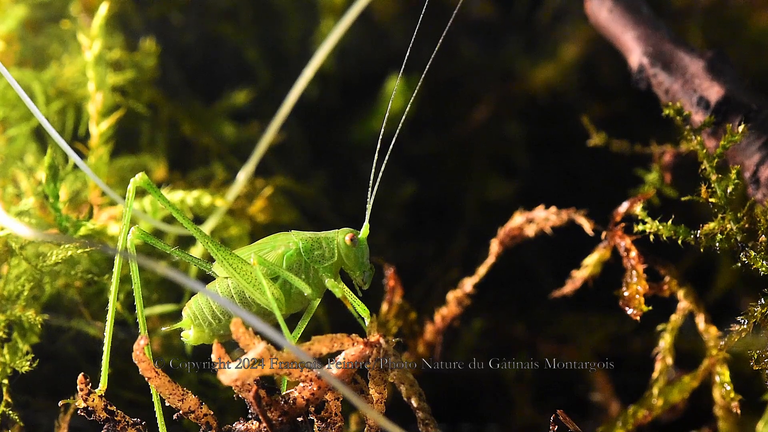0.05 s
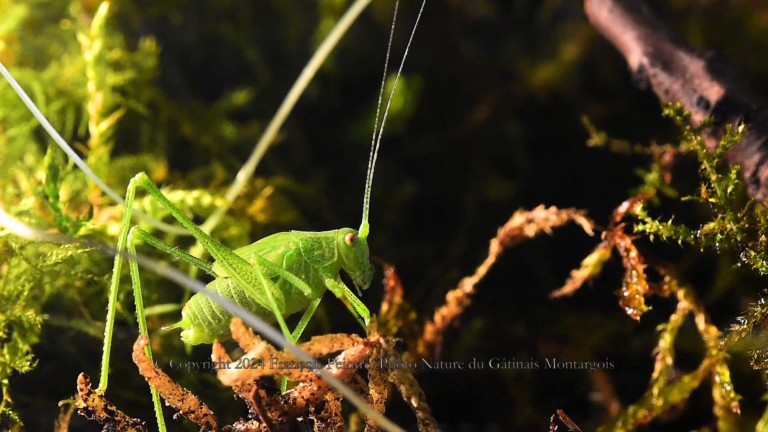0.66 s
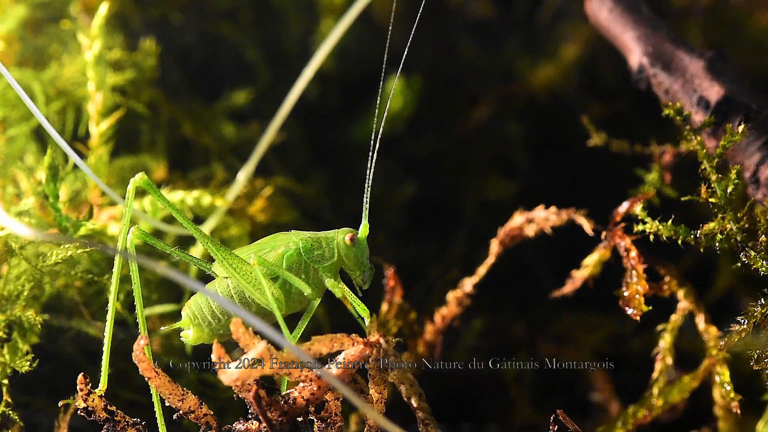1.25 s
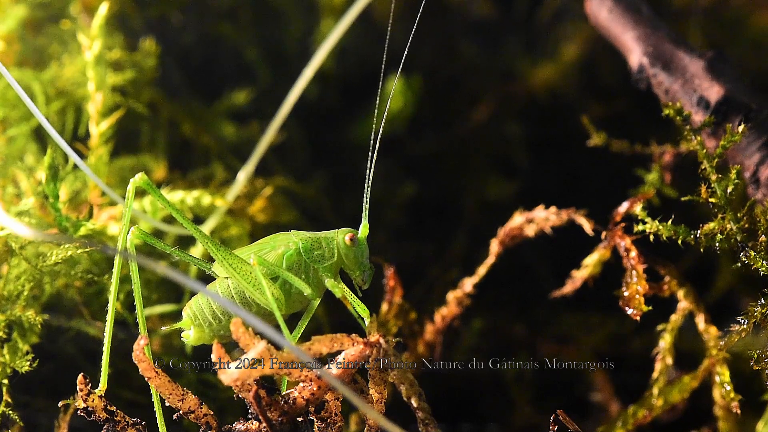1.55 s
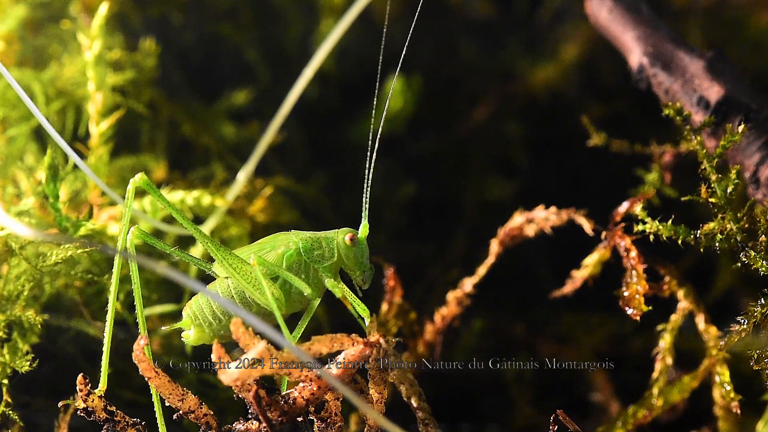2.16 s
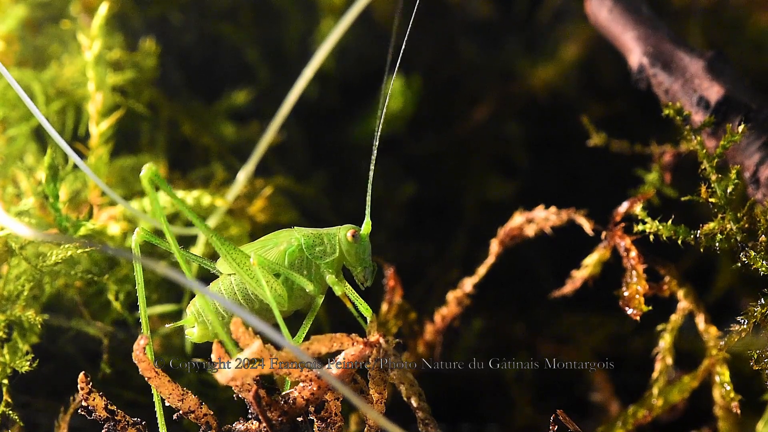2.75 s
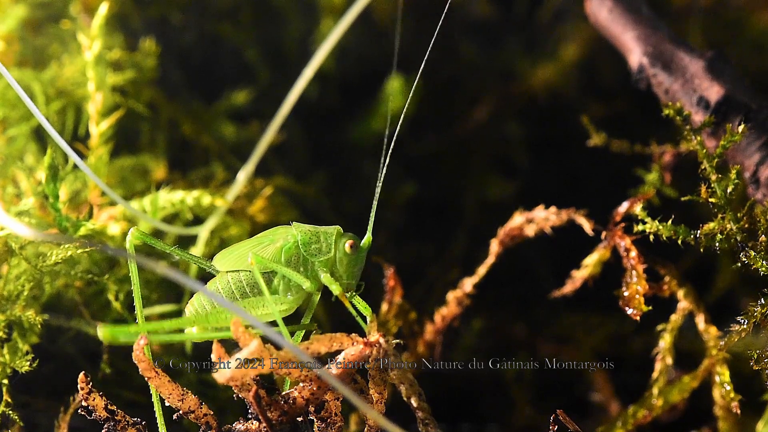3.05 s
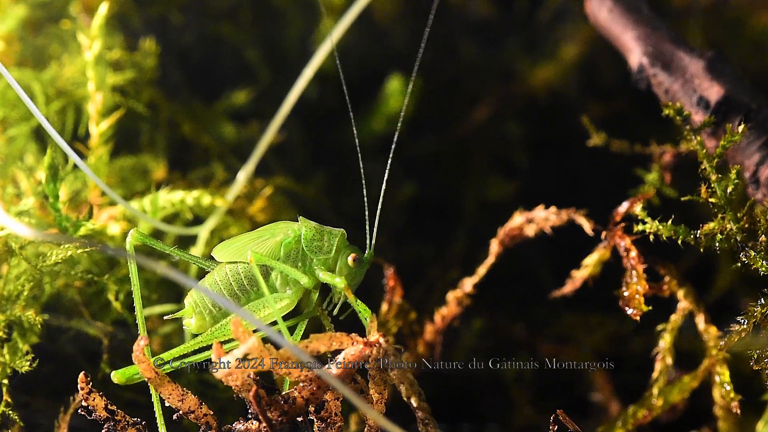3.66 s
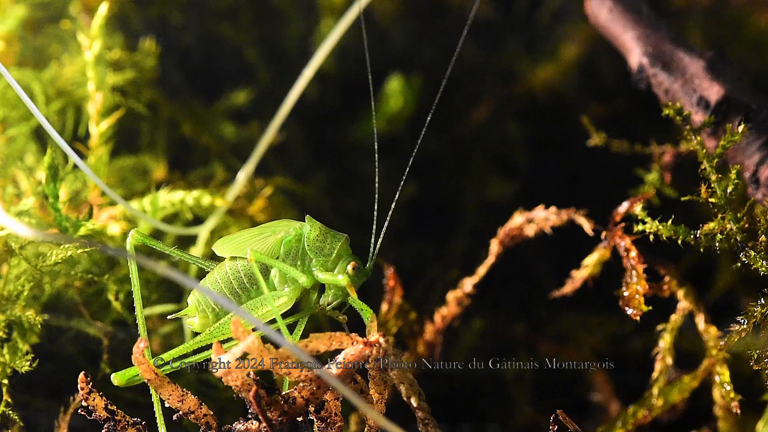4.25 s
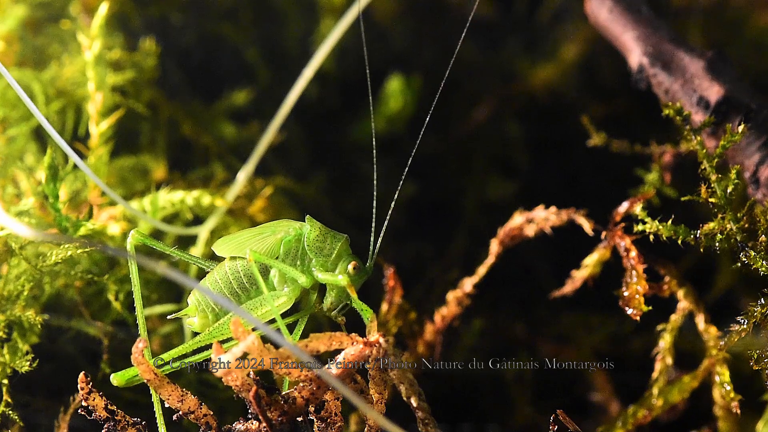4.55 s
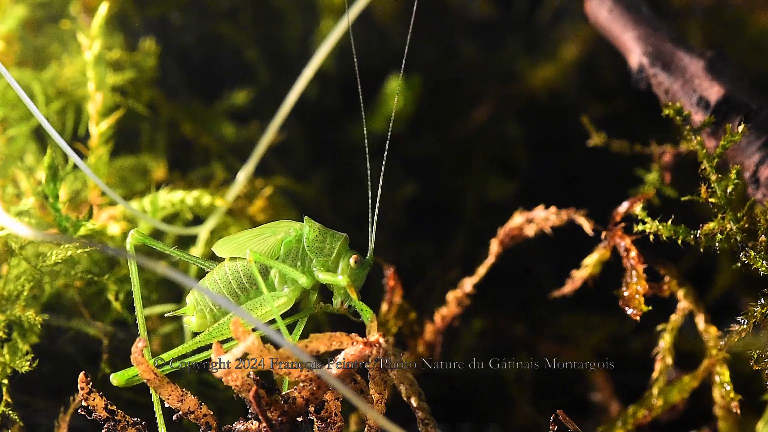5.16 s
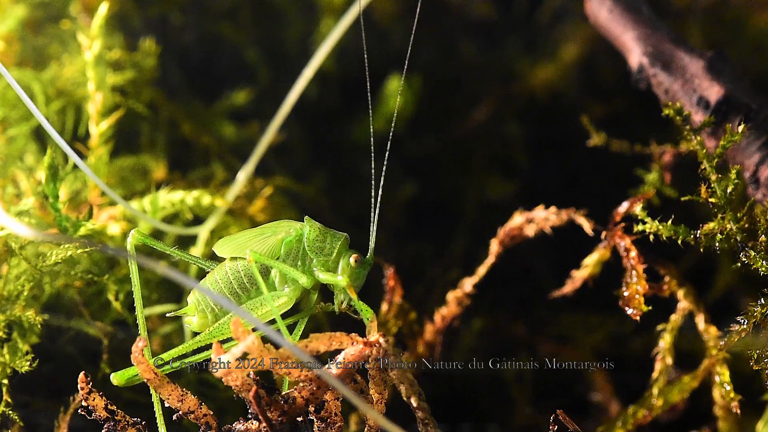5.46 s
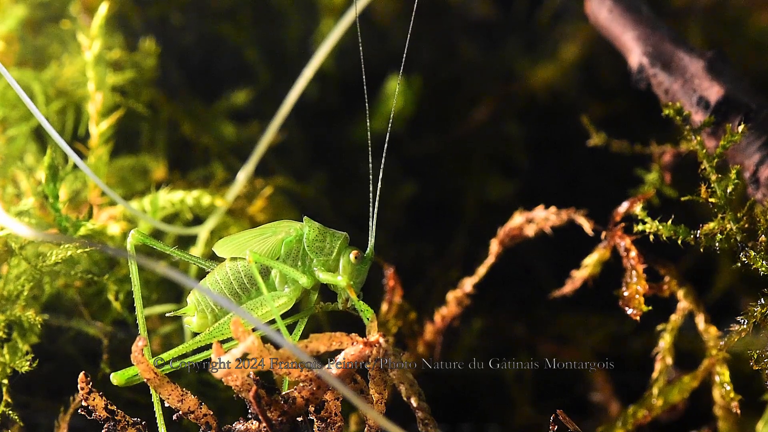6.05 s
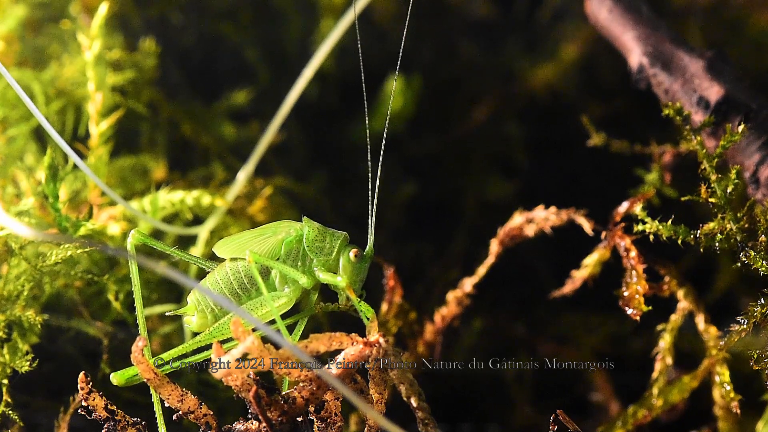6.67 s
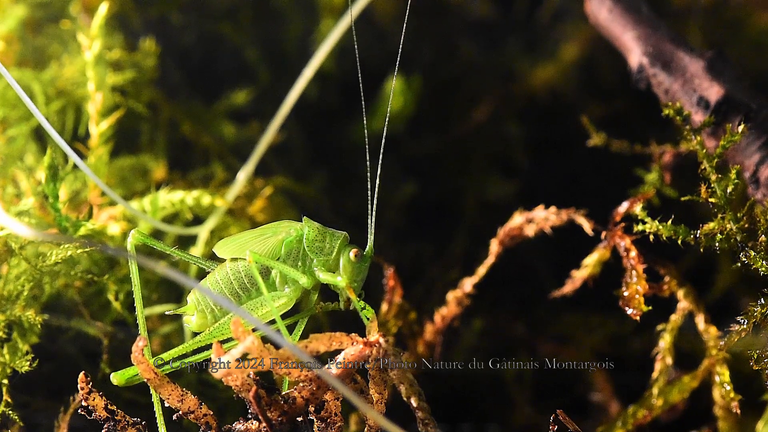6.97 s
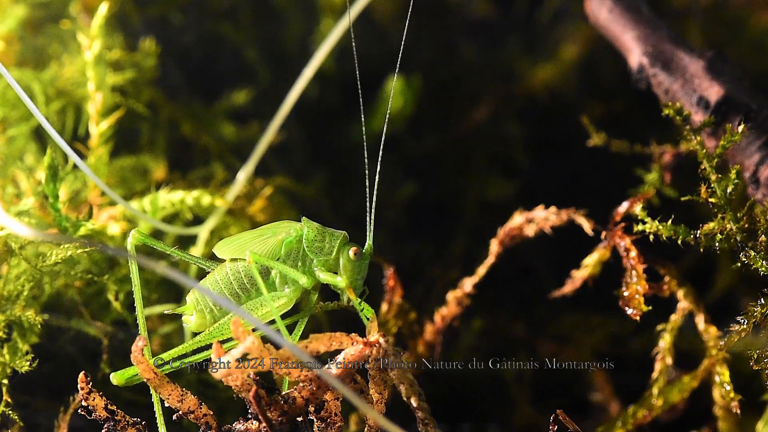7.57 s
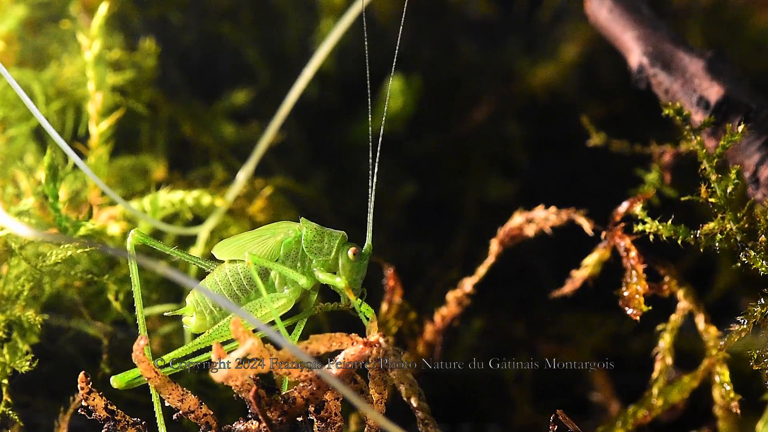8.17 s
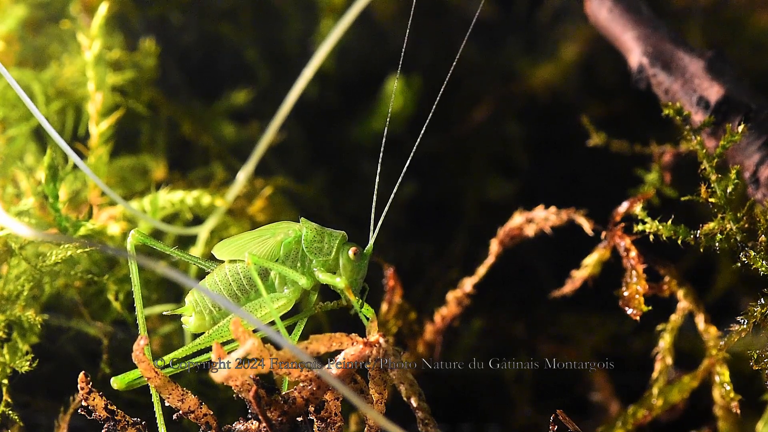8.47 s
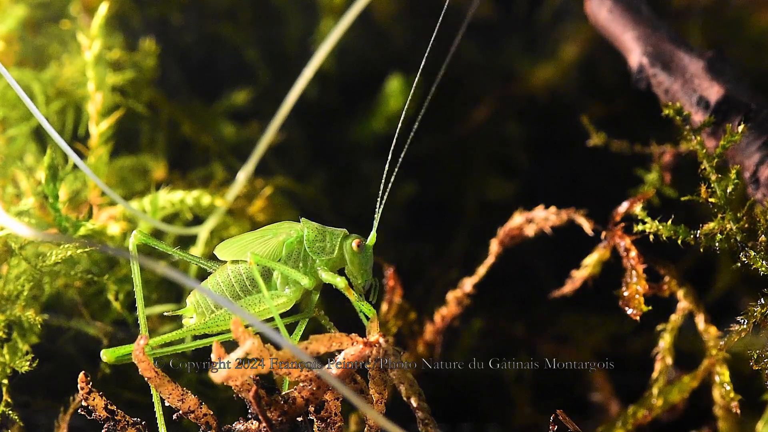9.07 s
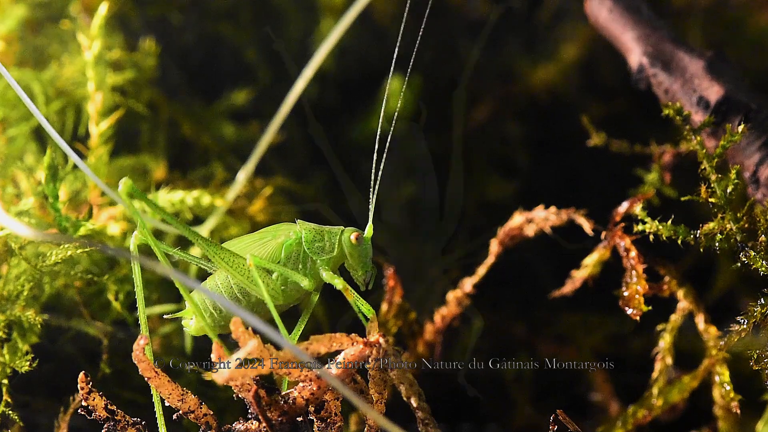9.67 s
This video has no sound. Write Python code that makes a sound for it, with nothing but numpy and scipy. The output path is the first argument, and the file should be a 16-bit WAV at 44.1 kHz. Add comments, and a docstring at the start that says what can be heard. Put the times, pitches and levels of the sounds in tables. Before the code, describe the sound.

Songbirds overlap in a wood, heard in stereo over a quiet, steady bed of air, with short echoes from trunks and leaves. A warbler chatters throughout in quick slurs, rasps and scratchy nasal notes, while mellow fluting and faint chirps come from further off. At about 1.4 seconds the loudest bird gives a pure whistle that swells as it falls, followed by four quick chirps. It whistles again at 2.6 seconds, with one chirp. Soft wingbeats pass from about 1.7 to 3.5 seconds. A second bird sings high zips and thin, buzzy rising and falling notes from about 2.8 to 4.4 seconds. The quieter chatter continues through the middle. The falling whistle returns at 7.7 seconds with four chirps, and high buzzy notes join from 8.6 seconds. The strongest whistle comes at 9.4 seconds, followed by one last chirp.

```python
"""Songbirds sing over each other in a wood, loudest a falling whistle followed by chirps.
A second bird sings high buzzy arches, a warbler chatters between them, mellow fluting comes from further off.
Each voice is a vibrating syrinx membrane filtered by the throat; trunks and leaves scatter every note.
Wings flap by over a quiet bed of air. A stereo pair of microphones hears it all."""
import sys
import numpy as np
from scipy import signal
from scipy.fft import rfft, irfft, next_fast_len
from scipy.io import wavfile
from scipy.ndimage import uniform_filter1d

SR = 44100
rng = np.random.default_rng(int(sys.argv[2]) if len(sys.argv) > 2 else 0)


def persist_wave(psi):
    """Save psi, clipped to +-1, as 16-bit WAV."""
    counts = np.round(np.clip(psi, -1, 1) * 32767).astype(np.int16)
    wavfile.write(sys.argv[1], SR, np.atleast_2d(counts).T)


N = 433062
TIME = np.arange(N) / SR

# whistle contour: offset_s, pitch_hz, level_db, buzz_depth_hz
WHISTLE_CONTOUR = [(0, 4296, -26, 0), (.04, 4212, -20, 0), (.08, 3980, -9.5, 0), (.12, 3858, -6, 0),
                   (.16, 3700, -4, 0.004), (.19, 3630, -2, 0), (.208, 3647, -3, 0), (.217, 3700, -24.5, 0)]
# whistles: start_s, pitch_ratio, level_db
WHISTLES = [(1.383, .99, -26), (2.569, 1.008, -22.5), (7.674, 1.0, -24), (9.41, 1.005, -21)]
def falling_whistles():
    """Lead bird: a pure tone that swells as it falls."""
    return repeated(WHISTLE_CONTOUR, WHISTLES, jitter=0.004, flutter_db=4.5)


# chirp contour: offset_s, pitch_hz, level_db, buzz_depth_hz
CHIRP_CONTOUR = [(0, 2843, -8.5, 99), (.008, 3145, 0, 200), (.019, 3518, -1, 280), (.028, 2750, -3.5, 250),
                 (.041, 3340, -5, 221.4), (.052, 3814, -5.5, 100), (.058, 3740, 2, 30),
                 (.075, 3460, 3.5, 30), (.088, 3330, 0.5, 29.7), (.097, 3413, -0.5, 30)]
# chirps: start_s, pitch_ratio, level_db
CHIRPS = [(1.665, 1, -29), (1.823, 0.99, -30.5), (1.981, 1, -32), (2.146, 1.002, -30), (2.859, 1.04, -27.5),
          (7.955, 1.018, -29.5), (8.106, 1.02, -29), (8.27, 0.98, -30), (8.438, 0.98, -30.5),
          (9.7, 1.042, -26.5)]
def chirps():
    """Lead bird: a raspy zigzag, then a loud downslur."""
    return repeated(CHIRP_CONTOUR, CHIRPS, jitter=0.013, flutter_db=3)


# high syllables: start_s, length_s, mid_pitch_hz, level_db
TSIPS = [(1.078, 0.052, 6170, -33), (1.398, 0.027, 5980, -29), (8.79, 0.025, 5210, -23.5)]
SIZZLES = [(2.43, 0.2, 7480, -48.5), (8.59, 0.12, 5800, -38.5), (8.61, .12, 7630, -45.5),
           (9.428, .122, 6450, -29), (9.675, 0.11, 6410, -29.5)]
ZITS = [(3.335, 0.03, 4790, -29.5), (9.346, 0.028, 5470, -29), (9.596, .031, 5490, -27)]
FLICKS = [(2.291, 0.031, 5190, -30.5), (2.854, 0.038, 4350, -28), (3.37, 0.023, 5380, -30),
          (8.762, 0.038, 4430, -28.5)]
SWOOPS = [(2.893, .1, 3850, -26), (3.112, 0.08, 3610, -30.5)]
def high_singer():
    """Second bird: arches, zips, pure tsips and buzzy slurs."""
    return (arches() + zip_run()
            + slurs(TSIPS, semitones=(0.52, -0.26), jitter=0.0019, flutter_db=-1)
            + slurs(SIZZLES, semitones=(0.85, -1.65), depth_hz=307, trill_hz=296.6, jitter=0.006)
            + slurs(ZITS, semitones=(1.74, -4.5), depth_hz=320, trill_hz=294, jitter=0.012)
            + slurs(FLICKS, semitones=(-2.59, 2.94), depth_hz=262, trill_hz=282, jitter=0.036)
            + slurs(SWOOPS, semitones=(7.3, -4), depth_hz=225, trill_hz=291.4, jitter=0.01))


# quick arch contour: length_share, pitch_hz, level_db, buzz_depth_hz
ARCH_CONTOUR = [(0, 5690, -8, 100), (.08, 6600, 4.5, 400), (0.188, 6940, -2, 250), (.33, 7600, -8.5, 100),
                (.62, 8020, -6.5, 100), (.82, 7750, -5, 120), (.92, 6240, 4, 200), (1, 4410, -0.5, 150)]
# quick arches: start_s, length_s, level_db
QUICK_ARCHES = [(3.282, .178, -27.5), (3.525, .16, -29.5)]
# long arch contour: time_s, pitch_hz, level_db
LONG_ARCH = [(4.027, 4850, -43), (4.049, 5260, -26.5), (4.081, 6440, -31.5), (4.179, 6860, -33),
             (4.29, 6660, -36), (4.307, 6180, -31.5), (4.345, 4560, -21.5), (4.365, 4330, -25.5),
             (4.385, 4090, -45)]
def arches(buzz_hz=290, undertone_db=-13, long_depth_hz=340):
    """Thin arches roughened by a fast pitch buzz; the quick ones carry a soft tone an octave below."""
    out = np.zeros(N)
    share, hz, db, depth_hz = np.transpose(ARCH_CONTOUR)
    for start_s, length_s, level_db in QUICK_ARCHES:
        add(out, start_s, glide(share * length_s, hz, db + level_db, depth_hz, buzz_hz,
                                jitter=0.0085, flutter_db=4.5, flutter_per_s=560))
        add(out, start_s, glide(share * length_s, hz / 2, level_db + undertone_db, jitter=0.013))
    time_s, hz, db = np.transpose(LONG_ARCH)
    add(out, time_s[0], glide(time_s, hz, db, long_depth_hz, buzz_hz,
                              jitter=0.0095, flutter_db=4.5, flutter_per_s=500))
    return out


def zip_run(start_s=3.049, count=7, gap_s=0.0265, length_s=0.025, pitch_hz=5810, fade_db_per_s=14):
    """Steep upward zips in a quick, fading row, no two alike."""
    errors = rng.uniform(-2.2, 2, (count, 3)) / np.sqrt(2)
    notes = []
    for offset_s, (late, sharp, loud) in zip(gap_s * np.arange(count), errors):
        level_db = -27.5 - fade_db_per_s * offset_s + 3.5 * loud
        hz = pitch_hz * (1 + 0.0453 * sharp)
        notes.append((start_s + offset_s + 0.003 * late, length_s, hz, level_db))
    return slurs(notes, semitones=(-3.5, 4.2), depth_hz=300, trill_hz=246, jitter=0.016)


# warbler syllables: start_s, length_s, mid_pitch_hz, level_db
DOWNSLURS = [(.375, 0.043, 3130, -45.5), (.805, 0.081, 3390, -43.5), (4.943, .054, 2950, -38.5),
             (5.703, 0.023, 3000, -46), (7.116, 0.05, 3060, -38.5), (7.428, 0.035, 3215, -36.5),
             (9.085, 0.047, 3210, -42), (9.395, 0.047, 3246, -36.5)]
RASPS = [(.182, .055, 4820, -44), (.345, .04, 4310, -37), (2.35, .017, 4020, -34.5),
         (4.637, 0.022, 4080, -33.5), (5.237, 0.03, 3335, -34.5), (5.988, 0.03, 4440, -38),
         (6.804, .044, 3690, -39.5), (7.357, 0.026, 3760, -43.5), (8.222, 0.037, 4550, -37.5)]
RISES = [(.47, 0.048, 2427, -42.5), (.96, 0.043, 3285, -41.5), (1.26, 0.073, 3090, -43.5),
         (4.375, 0.048, 2530, -42), (5.07, 0.073, 2797, -37.5), (5.535, 0.095, 2822, -39),
         (7.238, .076, 2800, -38), (7.755, .13, 2777, -40.5), (9.525, 0.084, 2830, -37)]
UPTICKS = [(.735, .068, 4450, -43.5), (1.037, 0.014, 4800, -35), (1.353, .015, 4430, -36),
           (5.912, 0.09, 5285, -42), (6.04, .028, 4150, -37.5), (6.088, .021, 4740, -39),
           (6.145, 0.023, 4620, -38), (6.775, 0.051, 4910, -46.5), (8.15, 0.068, 5156, -41),
           (8.28, 0.02, 4280, -36), (8.39, 0.012, 4360, -35), (8.555, 0.031, 4550, -41)]
BUZZES = [(4.725, 0.17, 4153, -40), (6.885, 0.16, 3850, -45), (9.2, .14, 4140, -40.5)]
WOBBLES = [(1.69, 0.089, 2720, -40.5), (3.762, 0.0443, 2516, -35.5), (3.893, 0.055, 2560, -35),
           (4.473, 0.041, 2556, -36), (4.628, 0.0424, 2490, -37), (5.166, 0.039, 3430, -39.5),
           (8.795, 0.049, 2520, -41)]
PEAKS = [(.065, 0.091, 4073, -42), (.51, 0.063, 3410, -39), (4.135, 0.049, 4380, -40),
         (5.815, .07, 7540, -49.5), (8.045, 0.065, 7790, -45.5)]
SCOOPS = [(.888, 0.026, 3416, -36.5), (1.133, 0.055, 3600, -41.5), (2.688, .1, 3030, -34.5),
          (7.387, .02, 3560, -38.5), (8.882, 0.1, 3068, -34), (9.118, 0.1, 3055, -35)]
HOOKS = [(1.33, .067, 3615, -40.5), (3.05, 0.063, 4120, -33), (3.06, 0.03, 2580, -38.5),
         (3.215, 0.036, 3250, -44), (3.25, 0.048, 2620, -44), (4.442, .017, 3410, -34.5),
         (5.635, 0.027, 3404, -34), (6.538, 0.037, 2540, -44), (6.596, 0.02, 3200, -39.5),
         (9.005, 0.023, 2624, -36), (9.248, 0.036, 2756, -38.5)]
def warbler():
    """Chatter strung from nine kinds of whistled syllable."""
    return (slurs(DOWNSLURS, semitones=(4.3, -5), jitter=0.014)
            + slurs(RASPS, semitones=(5.1, -2.5), depth_hz=220, trill_hz=202)
            + slurs(RISES, semitones=(-3, 2.19), depth_hz=80, trill_hz=46.5, jitter=0.008)
            + slurs(UPTICKS, semitones=(-3, 1.48), depth_hz=167, trill_hz=197.7)
            + slurs(BUZZES, semitones=(-5, 1), depth_hz=630, trill_hz=171, jitter=0.0254)
            + slurs(WOBBLES, semitones=(0.057, -0.83), depth_hz=260, trill_hz=38.6)
            + slurs(PEAKS, semitones=(-4.5, -7), jitter=0.01)
            + slurs(SCOOPS, semitones=(3.4, 0.5), depth_hz=110, trill_hz=123.6)
            + slurs(HOOKS, semitones=(-1.23, 0.036), jitter=0.012))


# arched triplets, rising stutters: start_s, pitch_hz, throat_hz, level_db
NASAL_TRIPLETS = [(0.599, 1016, 2480, -48), (1.483, 1034, 3320, -42.5), (5.333, 997, 3020, -43),
                  (7.535, 999, 3150, -45)]
NASAL_STUTTERS = [(0.861, 933, 4800, -45), (1.17, 908, 4270, -42), (4.497, 1135, 5180, -39),
                  (6.657, 934, 5300, -42.5), (8.941, 948, 5420, -39)]
# lone notes: start_s, length_s, pitch_hz, throat_hz, level_db
LONE_NASALS = [(.272, 0.038, 934, 3470, -45), (.265, 0.043, 930, 5300, -45.5),
               (1.874, .17, 1753, 5630, -46.5), (2.058, .12, 1003, 5660, -43),
               (5.167, 0.02, 1080, 4070, -41), (6.266, 0.0273, 940, 5200, -37),
               (6.394, 0.017, 968, 5050, -38), (8.678, 0.02, 912, 4660, -39)]
def nasal_calls(triplet_gap_s=0.057, triplet_note_s=0.0344, stutter_gap_s=0.041, stutter_note_s=0.0242):
    """The warbler's nasal notes: even threes, slowing threes or alone."""
    beats = np.arange(3)
    stretch = 1.3 ** beats
    offsets_s = stutter_gap_s * (np.cumsum(stretch) - stretch)
    triplets = [(start_s + k * triplet_gap_s, triplet_note_s, *voice)
                for start_s, *voice in NASAL_TRIPLETS for k in beats]
    stutters = [(start_s + offsets_s[k], stutter_note_s * stretch[k], *voice)
                for start_s, *voice in NASAL_STUTTERS for k in beats]
    return (nasal_voice(triplets, semitones=(-2.72, -3.4), jitter=0.033)
            + nasal_voice(stutters, semitones=(-2.04, 1.42), jitter=0.033)
            + nasal_voice(LONE_NASALS, semitones=(-1.4, 0.1), jitter=0.031))


# far syllables: start_s, length_s, mid_pitch_hz, level_db
FLUTES = [(.13, 0.083, 2552, -53), (1.93, 0.059, 2520, -53.5), (2.235, 0.039, 2094, -52),
          (2.62, 0.19, 1867, -56.5), (3.61, 0.055, 1905, -53), (3.97, .27, 1918, -53.5),
          (4.3, 0.099, 2184, -56.5), (5.725, 0.034, 1930, -43.5), (6.24, 0.26, 1913, -66),
          (6.9, 0.51, 1992, -68), (7.962, 0.021, 1913, -42.5), (8.14, 0.123, 1806, -56.5),
          (8.345, .2, 1889, -54.5), (8.63, 0.11, 2708, -51), (9.09, .15, 2203, -52), (9.66, 0.2, 2104, -54)]
FLUTE_FALLS = [(2.588, 0.035, 2100, -48.5), (3.03, 0.0302, 2250, -48), (3.075, 0.034, 1990, -50.5),
               (3.405, .045, 2380, -61), (3.675, .06, 3020, -58), (3.93, 0.037, 2350, -45),
               (4.51, 0.037, 2180, -54), (8.08, 0.073, 2156, -53.5), (9.35, .15, 1702, -57)]
FLUTE_TRILLS = [(2.455, .16, 2918, -43.5), (3.785, .15, 2875, -41)]
HOOT = [(7.17, 0.43, 444, -78.5)]
def fluting():
    """Mellow wavering notes, falls and trills from further off, and one low hoot."""
    return (slurs(FLUTES, semitones=(-1.134, -1.04), depth_hz=39, trill_hz=7.14, jitter=0.012)
            + slurs(FLUTE_FALLS, semitones=(3.5, -3.5), jitter=0.015)
            + slurs(FLUTE_TRILLS, semitones=(-1.07, -1), depth_hz=143.5, trill_hz=72.7, jitter=0.01)
            + slurs(HOOT, semitones=(-0.82, -0.5), jitter=0.005))


def far_chorus(count=80, level_db=-60, centre_hz=3400, spread=0.22):
    """Distant birds chirp at random: rising, falling and trilled notes."""
    def notes():
        pitches_hz = centre_hz * np.exp(spread * rng.triangular(-2, 0, 2, count))
        return [((k + late) / count * N / SR, 0.03 + 0.09 * long,
                 pitches_hz[k], level_db + 6 * (loud - 0.5))
                for k, (late, long, loud) in enumerate(rng.random((count, 3)))]
    return (slurs(notes(), semitones=(-3, 1.16))
            + slurs(notes(), semitones=(2.5, -3.5))
            + slurs(notes(), semitones=(-1.22, -1.16), depth_hz=228, trill_hz=108.3))


def repeated(contour, repeats, jitter, flutter_db, buzz_hz=240):
    """A learnt syllable, sung each time a little higher or lower."""
    out = np.zeros(N)
    offset_s, hz, db, depth_hz = np.transpose(contour)
    for start_s, pitch_ratio, level_db in repeats:
        add(out, start_s, glide(offset_s, hz * pitch_ratio, db + level_db, depth_hz, buzz_hz,
                                jitter, flutter_db, flutter_per_s=179.7))
    return out


def glide(time_s, hz, db, depth_hz=0, buzz_hz=0, jitter=0.003, flutter_db=2, flutter_per_s=150):
    """One whistled phrase along a pitch and level contour."""
    t = np.arange(int(max(time_s[-1] - time_s[0], 0.01) * SR)) / SR
    pitch, level, depth = [np.interp(t + time_s[0], time_s, np.broadcast_to(column, time_s.shape))
                           for column in (hz, db, depth_hz)]
    phase = syrinx(t, uniform_filter1d(pitch, size=200), depth, buzz_hz, jitter)
    tone = pure_tone(phase, second_db=-46, third_db=-51)
    fades = signal.windows.tukey(len(t), min(0.0008 / t[-1], 1))
    return from_db(level) * flutter(t, flutter_db, flutter_per_s) * tone * fades


def slurs(notes, semitones, depth_hz=0, trill_hz=0, jitter=0.018, flutter_db=4):
    """Short whistled notes sharing one pitch bend and an optional trill."""
    out = np.zeros(N)
    for start_s, length_s, hz, db in notes:
        t, pitch_hz, envelope = bend(length_s, hz, semitones)
        tone = pure_tone(syrinx(t, pitch_hz, depth_hz, trill_hz, jitter), second_db=-31.5, third_db=-44)
        add(out, start_s, from_db(db) * envelope * flutter(t, flutter_db, per_s=270) * tone)
    return out


def nasal_voice(notes, semitones, jitter, width_hz=900, quaver_share=0.029, quaver_hz=48, leak=0.0087):
    """A low, scratchy pulsing voice whose overtones sweep through one throat resonance."""
    out = np.zeros(N)
    harmonics = np.arange(2, 10)[:, None]
    for start_s, length_s, hz, throat_hz, db in notes:
        t, pitch_hz, envelope = bend(length_s, hz, semitones, attack_share=0.33, release_share=0.26)
        overtone_hz = harmonics * pitch_hz
        gains = 1 / (1 + ((overtone_hz - throat_hz) / width_hz) ** 2) + leak * (overtone_hz < throat_hz)
        phase = syrinx(t, pitch_hz, quaver_share * pitch_hz, quaver_hz, jitter)
        tone = rms_one((gains * np.sin(harmonics * phase)).sum(0))
        add(out, start_s, from_db(db) * envelope * flutter(t, db=5.5, per_s=300) * tone)
    return out


def bend(length_s, mid_hz, semitones, attack_share=0.21, release_share=0.13):
    """Time, parabolic pitch and envelope of a note; semitones = (start, end) relative to mid_hz."""
    t = np.arange(int(max(length_s, 0.005) * SR)) / SR
    share = t / t[-1]
    anchors_hz = mid_hz * 2 ** (np.array([semitones[0], 0, semitones[1]]) / 12)
    pitch_hz = np.polyval(np.polyfit([0, 0.5, 1], anchors_hz, 2), share)
    ramp = np.clip(np.minimum(share / attack_share, (1 - share) / release_share), 0, 1)
    return t, pitch_hz, np.sin(np.pi / 2 * ramp)


def syrinx(t, hz, depth_hz, trill_hz, jitter, unevenness=0.05):
    """Phase of a membrane whose pitch wavers and is shaken by a slightly uneven trill."""
    rate_hz = trill_hz * (1 + unevenness * wander(t, per_s=144.6))
    trill = np.cos(2 * np.pi * np.cumsum(rate_hz) / SR)
    pitch_hz = hz * (1 + jitter * wander(t, per_s=508)) + depth_hz * trill
    return 2 * np.pi * np.cumsum(pitch_hz) / SR


def pure_tone(phase, second_db=-40, third_db=-43):
    """The throat passes little but the fundamental; rms 1."""
    return np.sqrt(2) * (np.sin(phase) + from_db(second_db) * np.sin(2 * phase)
                         + from_db(third_db) * np.sin(3 * phase))


def flutter(t, db, per_s):
    """Uneven pulsing of the air flow; mean power 1."""
    return rms_one(from_db(db * wander(t, per_s)))


def roughen(song, rough_db, width_hz, hiss_db, highpass_hz):
    """Roughens each note and adds a faint hiss that follows its loudness."""
    lowpass = signal.butter(2, width_hz, fs=SR, output="sos")
    highpass = signal.butter(2, highpass_hz, "high", fs=SR, output="sos")
    shake = rms_one(signal.sosfilt(lowpass, rng.standard_normal(N)))
    hiss = signal.sosfilt(highpass, rng.standard_normal(N))
    loudness = np.sqrt(np.abs(uniform_filter1d(song ** 2, size=128)))
    return song * (1 + from_db(rough_db) * shake) + from_db(hiss_db) * loudness * hiss


# echoes off ground and nearest trunks: delay_s, level_db
ECHOES = [(.0062, -6), (.0135, -10), (.029, -25.5)]
def wood(song, scatter_db, tail_db, scatter_t60_s, left_db, tail_t60_s=1):
    """Direct sound, echoes off near trunks, quick scatter from foliage and a longer faint tail."""
    t = np.arange(int(0.8 * SR)) / SR
    twigs = rng.standard_normal((2, len(t))) * (rng.random((2, len(t))) < 900 / SR)
    scatter = rms_one(twigs * from_db(-60 * t / scatter_t60_s) * (t > 0.002))
    tail_envelope = from_db(-60 * t / tail_t60_s) * np.minimum(t / 0.033, 1)
    tail = rms_one(rng.standard_normal((2, len(t))) * tail_envelope)
    response = (from_db(scatter_db) * scatter + from_db(tail_db) * tail) / np.sqrt(len(t))
    response[:, 0] += 1
    for k, (delay_s, db) in enumerate(ECHOES):
        side = k % 2
        response[side, int(delay_s * SR)] += from_db(db)
        response[1 - side, int((delay_s + 0.0003) * SR)] += from_db(db) / 2
    balance = from_db([[left_db / 2], [-left_db / 2]])
    return signal.oaconvolve(song[None], response, axes=1)[:, :N] * balance


def wingbeats(start_s=1.69, count=13, beat_s=0.1435, quickening_s=0.001, stroke_s=0.029,
              nearest_s=2.24, pass_s=0.74, level_db=-54):
    """A large bird flies past: each downstroke pushes out a whoosh, loudest where it is nearest."""
    gaps_s = beat_s - quickening_s * np.arange(count)
    times_s = start_s + np.cumsum(gaps_s) - gaps_s
    strokes = sum(np.exp(-0.5 * ((TIME - s) / stroke_s) ** 2) for s in times_s)
    distance = np.hypot(1, (TIME - nearest_s) / pass_s)
    whoosh = noise([(280, -45), (430, -2), (900, -2), (1500, -9.5), (3000, -16.5)])
    return from_db(level_db) * strokes / distance * whoosh


# air spectrum: frequency_hz, relative_db
AIR_SPECTRUM = [(18, -34), (30, -14.5), (65, -15), (180, -14), (822, -7.5), (908, -6), (1570, -9.5),
                (2060, -8), (2580, -2.5), (3230, -10), (3480, -5), (4360, -3), (6330, -14.5), (10700, -13),
                (11500, -20), (12200, -70), (15000, -105), (22000, -120)]
def still_air(level_db=-56):
    """A steady, quiet bed of noise."""
    return from_db(level_db) * noise(AIR_SPECTRUM, correlation=0.81)


# rush envelope: time_s, level_db
RUSH_ENVELOPE = [(7.8, -77), (8.1, -62.5), (8.45, -59), (8.8, -63), (9.1, -74)]
def far_rush(gain_db=-2):
    """A soft midrange rush swells and fades once."""
    level_db = np.interp(TIME, *np.transpose(RUSH_ENVELOPE), left=-120, right=-120)
    return from_db(gain_db + level_db) * noise([(600, -23), (1100, -2.5), (1400, -8), (2200, -32)])


# drone partials: pitch_hz, level_db
DRONE_PARTIALS = [(69, -83.5), (139, -89.5)]
def far_drone():
    """Two faint, low, wavering tones."""
    return sum(from_db(db) * pure_tone(2 * np.pi * hz * TIME + wander(TIME, per_s=9.8))
               for hz, db in DRONE_PARTIALS)


def noise(spectrum, correlation=1):
    """Stereo noise coloured by (frequency_hz, relative_db) points; rms 1."""
    size = next_fast_len(N)
    colour = from_db(at_hz(spectrum, np.fft.rfftfreq(size, 1 / SR)))
    mid, side = irfft(rfft(rng.standard_normal((2, size))) * colour, size)[:, :N]
    return rms_one(np.sqrt(1 + correlation) * mid + np.sqrt(1 - correlation) * side * [[1], [-1]])


def wander(t, per_s):
    """Random drift, spread about 1."""
    return np.interp(t * per_s, np.arange(512), rng.standard_normal(512))


def from_db(db):
    """Decibels to gain."""
    return 10 ** (np.asarray(db) / 20)


def rms_one(x):
    """Scale to rms 1."""
    return x / np.sqrt(np.mean(x ** 2) + 1e-20)


def at_hz(points, hz):
    """Read a table on a log-frequency axis."""
    points_hz, values = np.transpose(points)
    return np.interp(np.log(np.maximum(hz, 1)), np.log(points_hz), values)


def add(out, start_s, sound):
    """Mix a sound in at start_s."""
    i = max(int(start_s * SR), 0)
    out[i:i + len(sound)] += sound[:max(N - i, 0)]


def scene():
    """Each voice has its own level, scatter and balance in the wood, over the background."""
    whistling = from_db(-1) * falling_whistles()
    chirping = from_db(-1) * chirps()
    high = from_db(-4) * roughen(high_singer(),
                                 rough_db=-20.5, width_hz=680, hiss_db=-22.5, highpass_hz=3540)
    chatter = from_db(-2.5) * roughen(warbler() + nasal_calls(),
                                      rough_db=-13, width_hz=410, hiss_db=-39, highpass_hz=2000)
    far = fluting() + far_chorus()
    return (wood(whistling, scatter_db=-1, tail_db=-8.5, scatter_t60_s=0.084, left_db=-1)
            + wood(chirping, scatter_db=-6, tail_db=-15.5, scatter_t60_s=0.16, left_db=-1.5)
            + wood(high, scatter_db=-2.5, tail_db=-23, scatter_t60_s=0.22, left_db=-0.1)
            + wood(chatter, scatter_db=-3.5, tail_db=-13, scatter_t60_s=0.13, left_db=-2.5)
            + wood(far, scatter_db=0, tail_db=-17.5, scatter_t60_s=0.092, left_db=-2)
            + still_air() + far_rush() + far_drone() + wingbeats())


# phase between the microphones: frequency_hz, left_lead_rad
MIC_PHASE = [(300, -0.27), (700, -0.62), (1100, -0.36), (1900, -1.38), (2900, -2.16), (3800, -1.7),
             (5000, -1.6), (7500, -1.44)]
CUTOFF_HZ = 11800
def record(dry):
    """The two microphones hear the treble out of step; the top is cut."""
    size = next_fast_len(N + 4096)
    lead_rad = at_hz(MIC_PHASE, np.fft.rfftfreq(size, 1 / SR))
    rotation = np.exp(0.5j * lead_rad * np.array([[1], [-1]]))
    pair = irfft(rfft(dry, size) * rotation, size)[:, :N]
    return signal.sosfilt(signal.ellip(10, 0.1, 70, CUTOFF_HZ, fs=SR, output="sos"), pair)


dry = scene()
out = record(dry)
persist_wave(out)
```